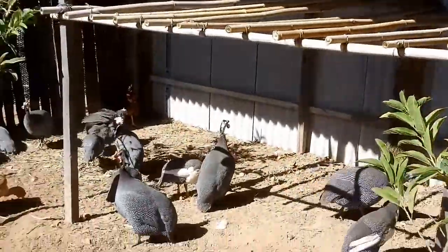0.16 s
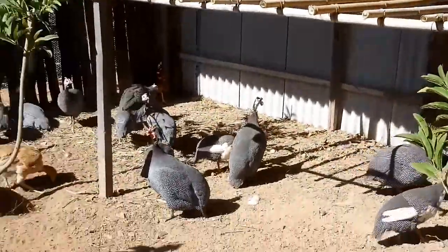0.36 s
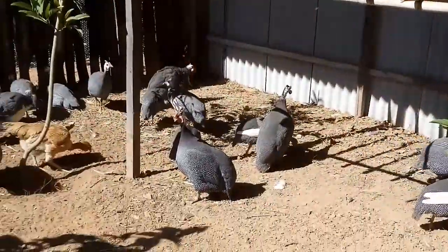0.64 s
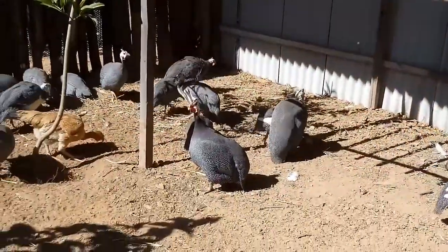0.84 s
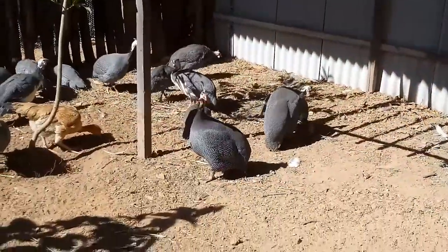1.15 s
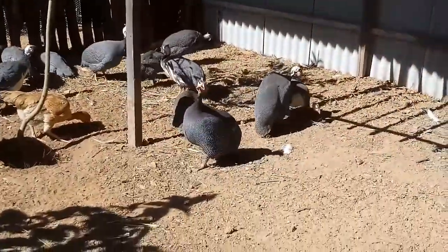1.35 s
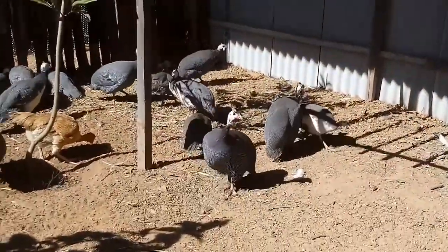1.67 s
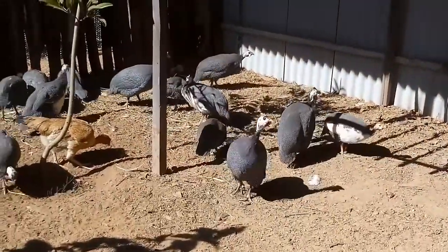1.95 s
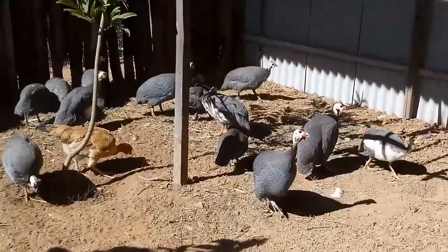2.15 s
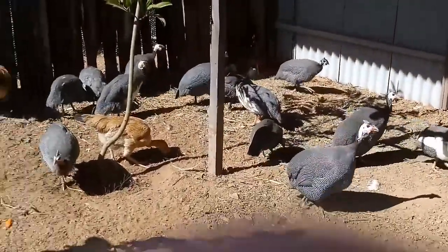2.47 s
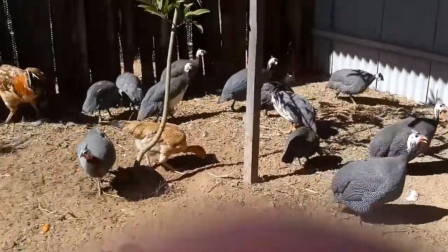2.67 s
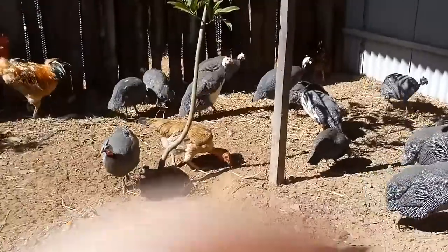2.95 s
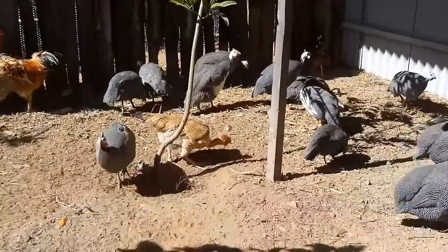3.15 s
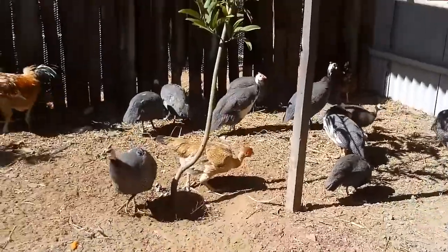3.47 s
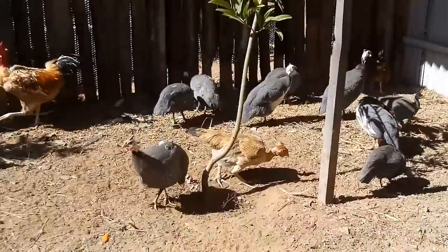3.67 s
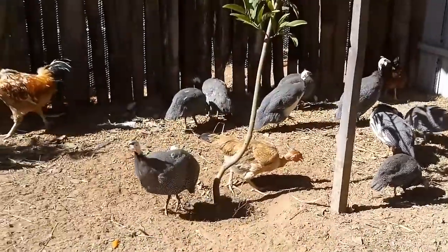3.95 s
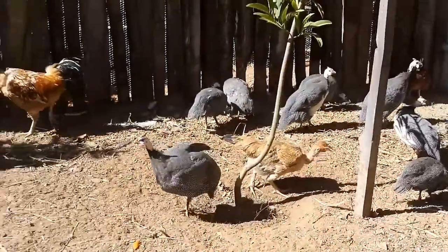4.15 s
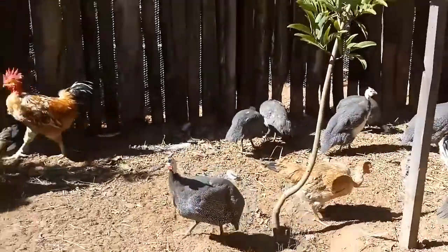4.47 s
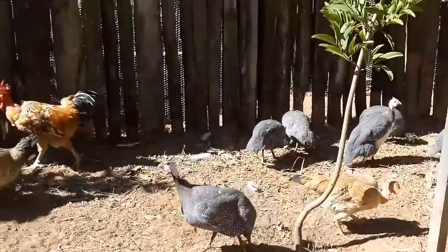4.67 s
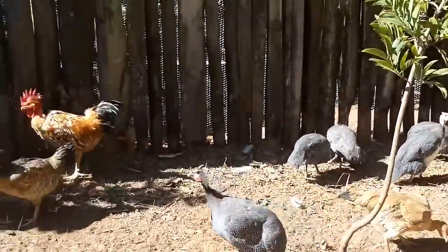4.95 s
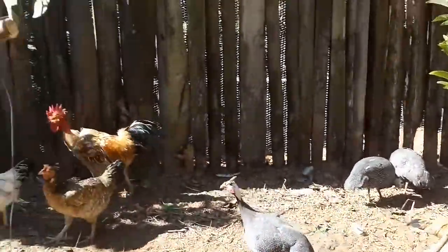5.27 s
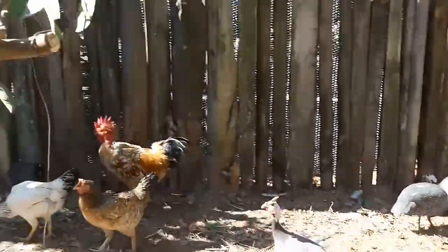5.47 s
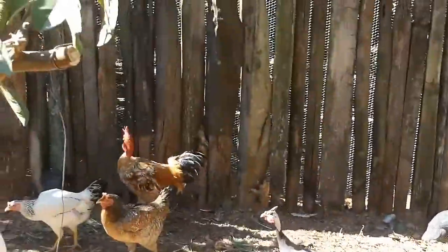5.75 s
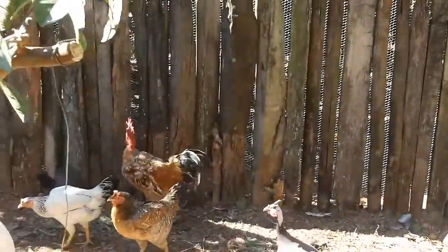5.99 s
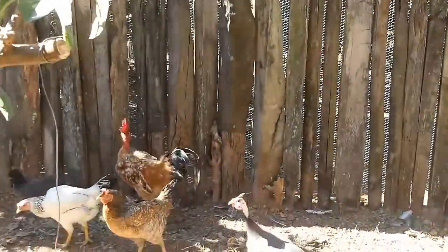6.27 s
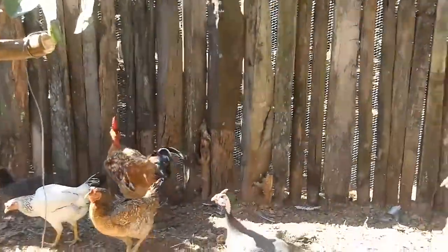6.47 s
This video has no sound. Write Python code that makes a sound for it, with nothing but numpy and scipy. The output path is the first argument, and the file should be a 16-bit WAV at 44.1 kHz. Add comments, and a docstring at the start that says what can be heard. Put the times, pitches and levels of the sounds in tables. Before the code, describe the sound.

A guineafowl flock chatters nonstop, short rising whistles overlapping harsh rattling squawks, with low hen clucks beneath and a light breeze rumbling on the microphone.

```python
"""A flock of guineafowl in a dirt pen: from the outset whistles near 1.5 kHz, as bending sines, overlap
hoarse squawks, rough partials and breath ringing a throat; wavering low harmonic stacks make hen clucks
and underlie some squawks. Sparse echoes follow each call; a breeze of filtered noise rumbles, strongest
at first, over a faint yard. Two-partial coos come near 2.9, 4.7 and 4.9 s. Just after 5.1 s the hand holding
the microphone shifts twice, as low resonant noise; the breeze sinks by 5.6 s, then rises again to the end."""
import sys
import numpy as np
from scipy import signal
from scipy.fft import rfft, irfft
from scipy.io import wavfile

SR = 44100
rng = np.random.default_rng(int(sys.argv[2]) if len(sys.argv) > 2 else 0)


def to_wav(sig):
    """Store sig (one row per channel, or 1-D mono) as 16-bit WAV at the path in sys.argv[1].

    Samples outside -1..1 are clipped; the rate is SR.
    """
    pcm = np.clip(np.atleast_2d(sig), -1, 1) * 32767
    pcm = np.round(pcm).astype(np.int16)
    wavfile.write(sys.argv[1], SR, pcm.T)  # frames by channels


def natural_amplitude(level_db):
    """Convert a level in decibels to a linear amplitude factor, elementwise."""
    exponent = np.asarray(level_db, float) / 20
    return 10 ** exponent


N = 291942  # length [samples]


def evened(x):
    """Power normalisation: scales to rms 1."""
    return x / np.sqrt(np.mean(x ** 2) + 1e-20)


def add(mix, s, sound):
    """Superposition: sums a sound into the mix from second s."""
    part = mix[round(s * SR):][:len(sound)]
    part += sound[:len(part)]


def coloured(x, points):
    """Linear filtering: multiplies the spectrum by a curve of dB over log frequency."""
    f, db = np.transpose(points)
    hz = np.fft.rfftfreq(x.shape[-1], 1 / SR)
    gain_db = np.interp(np.log(hz + 1), np.log(f + 1), db)
    return irfft(rfft(x) * natural_amplitude(gain_db), x.shape[-1])


def low_noise(size, hz):
    """Low-pass filtering: white noise with its fast changes above hz removed."""
    return signal.lfilter(*signal.butter(2, hz, fs=SR), rng.standard_normal(size))


def wobble(size, hz):
    """Random modulation: a drift of rms near 1 that changes up to hz times a second."""
    return evened(low_noise(16384, hz))[-size:].clip(-1.9, 1.9)


def resonate(x, hz, width):
    """Resonance: a moving peak of gain 1, its one-pole response applied twice for steep skirts."""
    turn = np.exp(2j * np.pi * np.cumsum(hz) / SR)
    r = np.exp(-np.pi * width / SR)
    # shift the peak to 0 Hz, filter there, shift back
    return 2 * (turn * signal.lfilter([(1 - r) ** 2], [1, -2 * r, r * r], x / turn)).real


def edges(size, rise, fall):
    """Amplitude envelope: straight fades in and out, in seconds."""
    t = np.arange(size) / SR
    return np.clip(np.minimum(t / rise, t[::-1] / fall), 0, 1)


UPPER_FADE_DB = -6.5  # the upper partials are brightest at the start of a tone
NASAL_HZ, NASAL_DB = 1460, -14.5  # tones that start below this pitch have a strong second partial
# Bending whistles of the flock, and two short high tones near 2.35 kHz within squawks:
# (time [s], length [s], start pitch [Hz], end pitch [Hz], level [dB], upper partials [dB])
BENDING_TONES = [(0.035, 0.04, 1292, 1342, -30.5, -45), (0.062, 0.086, 1512, 1594, -21.5, -29),
                 (0.14, 0.072, 1553, 1684, -34, -35), (0.213, 0.047, 981, 1156, -33.5, -44),
                 (0.297, 0.093, 1514, 1587, -34.5, -24), (0.385, 0.086, 1580, 1897, -25.5, -35.5),
                 (0.52, 0.032, 1278, 1243, -31.5, -38), (0.7, 0.12, 1500, 1564, -25.5, -27.5),
                 (0.885, 0.095, 1621, 1778, -24, -32.5), (0.965, 0.034, 1857, 1980, -26, -43),
                 (0.98, 0.13, 1500, 1500, -31.5, -25), (1.258, 0.042, 831, 1318, -40, -35.5),
                 (1.293, 0.07, 1305, 1368, -28, -35.5), (1.303, 0.1, 1526, 1554, -25, -30),
                 (1.41, 0.12, 1625, 1678, -30, -30.5), (1.645, 0.16, 1500, 1650, -29.5, -26),
                 (1.79, 0.065, 1250, 1174, -33, -61), (1.925, 0.082, 1596, 1701, -28, -34.5),
                 (1.995, 0.11, 1526, 1650, -21, -31.5), (2.19, 0.05, 1516, 1500, -36, -28),
                 (2.295, 0.039, 934, 1250, -42, -44), (2.34, 0.042, 1531, 1527, -24, -26.5),
                 (2.43, 0.13, 1490, 1732, -28.5, -28.5), (2.62, 0.049, 1225, 1310, -28.5, -42.5),
                 (2.645, 0.13, 1498, 1668, -20, -32), (2.85, 0.059, 1572, 1545, -35, -29),
                 (2.985, 0.16, 1657, 1608, -31.5, -27), (3.09, 0.1, 1540, 1527, -34, -32.5),
                 (3.265, 0.16, 1481, 1729, -26.5, -33.5), (3.48, 0.088, 1610, 1657, -25.5, -30),
                 (3.695, 0.18, 1490, 1698, -29.5, -27), (3.9, 0.1, 1500, 1663, -19.5, -33.5),
                 (4.0, 0.079, 1323, 1526, -25, -54), (4.07, 0.091, 1462, 1709, -23, -34),
                 (4.355, 0.053, 890, 1356, -38, -62), (4.425, 0.18, 1484, 1608, -28.5, -27.5),
                 (4.72, 0.044, 1350, 1336, -30, -37.5), (4.732, 0.04, 2370, 2420, -34, -37.5),
                 (5.49, 0.051, 2364, 2286, -33, -50), (4.96, 0.16, 1400, 1697, -25.5, -29.5),
                 (5.135, 0.11, 1587, 1614, -27, -24.5), (5.39, 0.051, 1240, 1252, -33, -53),
                 (5.49, 0.067, 1238, 1442, -33, -40), (5.54, 0.092, 1576, 1724, -24, -34.5),
                 (5.69, 0.068, 1220, 1397, -28, -40), (5.735, 0.11, 1440, 1530, -22.5, -29),
                 (5.8, 0.16, 1500, 1595, -30.5, -27), (6.04, 0.076, 1603, 1722, -25, -32),
                 (6.34, 0.13, 1254, 1268, -41, -42.5), (6.515, 0.042, 1513, 1500, -25.5, -27),
                 (6.565, 0.069, 1563, 1742, -27, -30)]


def bending_tone(length, start_hz, end_hz, db, third_db):
    """Frequency modulation: a near sine bends and roughens; pressed voices have strong, smeared upper partials."""
    size = round(length * SR)
    u = np.linspace(0, 1, size)
    pressed = np.clip(.5 + (third_db - db + 8) / 14, .15, 1)
    hoarse = pressed * (.3 + u)
    glide_hz = start_hz + (end_hz - start_hz) * u ** 1.1
    hz = glide_hz * (1 + 0.0211 * hoarse * wobble(size, hz=122))
    a = 2 * np.pi * np.cumsum(hz) / SR
    tremble = natural_amplitude(6.83 * hoarse * wobble(size, hz=108.3))
    flutter = np.cos(a / 4.9 + 2.0 * wobble(size, hz=45.4))  # a slower membrane cycle adds sidebands
    smear = hoarse * (.5 * wobble(size, hz=200) + 1.2 * flutter)
    upper = np.sin(3 * a + smear) + natural_amplitude(7.5) * np.sin(4 * a + smear)
    upper = resonate(upper, np.full(size, 4750.), width=795)  # the beak favours one band
    upper *= natural_amplitude(third_db + UPPER_FADE_DB * (u - .5) + 4.2 * hoarse * wobble(size, hz=145))
    second_db = NASAL_DB if start_hz < NASAL_HZ else -21  # relative to the first partial
    second = natural_amplitude(second_db) * np.sin(2 * a + .5 * smear)
    tone = natural_amplitude(db) * tremble * (1 + .5 * u * flutter) * (np.sin(a) + second)
    return np.sqrt(2) * (tone + upper) * edges(size, 0.011, 0.019)


PULSE_HZ = 352  # nominal pitch, before drift
PUFF_DB, PUFF_HZ = -60, 160  # the low push of air under a squawk: level, low-pass corner
CHEST_DB = -49  # the lowest partial, before effort and wobble
# tilt of the beak bands at 0 dB effort [dB], and how much they regain per dB of lost effort
TREBLE_DB, TREBLE_PER_DB = -18.5, 1.0239
# Throat resonances of a squawk: (centre [Hz], width per pole [Hz], level [dB], share of the beak tilt [0-1])
THROAT_RINGS = [(670, 620, -11, 0.21), (1500, 510, -4.5, 0.83), (1920, 630, 0.5, 0.67),
                (2474, 1210, -7.5, 0.37), (3970, 1800, -11.5, 0.041), (4750, 800, -1, 0.58),
                (5450, 1810, -7, 0.8)]
# Hoarse squawks of the flock: (time [s], rise [s], length [s], effort [dB])
SQUAWK_NOTES = [(0.022, 0.024, 0.099, -3.5), (0.11, 0.035, 0.24, -20), (0.33, 0.029, 0.23, -9.5),
                (0.577, 0.019, 0.16, -6), (0.78, 0.051, 0.14, -12), (0.93, 0.03, 0.33, -20),
                (1.1, 0.038, 0.19, -11), (1.36, 0.057, 0.25, -11), (1.65, 0.032, 0.24, -16.5),
                (1.945, 0.03, 0.19, -13), (2.113, 0.024, 0.13, -5), (2.296, 0.047, 0.15, -40),
                (2.34, 0.037, 0.3, -13.5), (2.68, 0.0077, 0.17, -15), (2.84, 0.035, 0.048, -14.5),
                (2.995, 0.043, 0.24, -10), (3.275, 0.022, 0.21, -8.5), (3.52, 0.039, 0.13, -15.5),
                (3.677, 0.022, 0.13, -3), (3.76, 0.068, 0.2, -19), (3.96, 0.089, 0.26, -19.5),
                (4.25, 0.0069, 0.16, -9), (4.44, 0.033, 0.23, -10.5), (4.73, 0.018, 0.046, -24),
                (4.79, 0.0073, 0.12, -2.5), (4.99, 0.15, 0.28, -25), (5.2, 0.1, 0.24, -8),
                (5.495, 0.033, 0.067, -21), (5.58, 0.038, 0.24, -19), (5.76, 0.11, 0.31, -21.5),
                (6.06, 0.075, 0.16, -23), (6.252, 0.012, 0.15, -6), (6.52, 0.037, 0.21, -24.5)]


def squawk(rise, length, effort_db):
    """Source and filter: rattling partials and breath ring a throat that drops if hard, climbs if soft."""
    size = round(length * SR)
    t = np.arange(size) / SR
    hard = np.clip((.035 - rise) / .015, 0, 1)  # a quick rise is a hard start
    slow_drift = rng.uniform(-0.047, 0.16) + .04 * wobble(size, hz=12)
    drift = 1 + (1.3 - hard) * slow_drift + 0.01595 * wobble(size, hz=159)
    turns = np.cumsum(PULSE_HZ * drift) / SR
    folds = np.zeros(size)
    for k in range(3, 20):
        folds += natural_amplitude(6.1 * wobble(size, hz=31.0)) * np.cos(2 * np.pi * (k * turns + rng.random()))
    breath = rng.standard_normal(size)
    drive = .8 * evened(folds) + .45 * breath
    drive *= natural_amplitude(2.5 * wobble(size, hz=130).clip(-3, 1.5))  # the rattle
    onset = hard * np.exp(-t / .025)
    mouth = 1 + 0.2 * onset + (1 - hard) * 0.058 * (t / length - .4)
    out = np.zeros(size)
    for k, (hz, width, db, treble) in enumerate(THROAT_RINGS):
        lean_db = treble * (TREBLE_DB - TREBLE_PER_DB * effort_db) + 2.5 * wobble(size, hz=12)
        lean_db -= 17 * onset * abs(np.log2(hz / 3000))  # a hard start first favours the bands near 3 kHz
        out += (-1) ** k * natural_amplitude(db + lean_db) * resonate(drive, hz * mouth, width)
    out += natural_amplitude(PUFF_DB) * evened(low_noise(size, PUFF_HZ))
    out += natural_amplitude(CHEST_DB + 6.7 * wobble(size, hz=30)) * np.sin(2 * np.pi * turns)
    fade_db = -18 * np.clip((t - rise) / (length - rise), 0, 1) ** 0.81
    return natural_amplitude(effort_db + fade_db) * out * edges(size, rise, 0.077) ** (1 - .5 * hard)


# one throat resonance: its centre, the detuning that costs 6 dB, the most lost, the weak first partial
LOW_THROAT_HZ, LOW_DETUNE_HZ, LOW_LOSS_DB, LOW_FIRST_DB = 988, 42.7, 20.5, -15.5
# Low harmonic notes near 330 Hz: hen clucks, and the low partials under some squawks:
# (time [s], length [s], nominal pitch [Hz], level [dB])
LOW_NOTES = [(0.04, 0.25, 347.5, -49), (0.22, 0.039, 352, -36), (0.43, 0.071, 332.4, -44),
             (0.59, 0.15, 355, -51), (0.78, 0.1, 331.3, -46.5), (0.96, 0.098, 327, -47.5),
             (1.08, 0.12, 319, -50.5), (1.4, 0.042, 345, -41), (1.49, 0.058, 327.8, -45),
             (2.05, 0.073, 336, -44), (2.46, 0.1, 333.3, -46.5), (2.83, 0.063, 309.1, -35),
             (3.04, 0.06, 335.6, -45.5), (3.14, 0.062, 314, -45.5), (3.3, 0.16, 327.6, -47.5),
             (3.54, 0.07, 332, -45), (3.69, 0.093, 352, -44), (3.84, 0.061, 326, -45),
             (3.98, 0.13, 335.5, -47), (4.25, 0.071, 336.3, -41.5), (4.5, 0.13, 330, -48.5),
             (5.08, 0.087, 331, -45.5), (5.2, 0.25, 352, -45.5), (5.6, 0.1, 328.5, -51.5),
             (5.82, 0.16, 329.6, -44.5), (6.08, 0.11, 328.6, -51.5), (6.26, 0.087, 352, -42.5),
             (6.34, 0.059, 301.7, -34.5), (6.55, 0.072, 335.4, -50)]


def low_note(length, hz, db):
    """Harmonic series: a wavering stack that favours partials near 1, 2 and 3.7 kHz."""
    size = round(length * SR)
    scoop = .1 * np.exp(-np.arange(size) / SR / .015)  # the pitch rises at the start
    pitch_hz = hz * (1 + .018 * wobble(size, hz=45) - scoop)
    a = 2 * np.pi * np.cumsum(pitch_hz) / SR
    stack = np.sin(3 * a) + natural_amplitude(7.0) * np.sin(6 * a) + natural_amplitude(-8) * np.sin(11 * a)
    stack += natural_amplitude(-16) * (np.sin(2 * a) + np.sin(4 * a))
    detuning = (3 * hz - LOW_THROAT_HZ) / LOW_DETUNE_HZ
    third_db = db - min(6 * detuning ** 2, LOW_LOSS_DB)
    first = natural_amplitude(db + LOW_FIRST_DB + 4.5 * wobble(size, hz=35)) * np.sin(a)
    stack *= natural_amplitude(third_db + 5.8 * wobble(size, hz=51.6))
    return np.sqrt(2) * (first + stack) * edges(size, 0.0067, 0.0059)


# Soft coos of the hens: (time [s], length [s], pitch [Hz], first partial [dB], second partial [dB])
COO_NOTES = [(2.91, 0.091, 562, -61, -43.5), (4.65, 0.085, 783, -53, -67), (4.91, 0.095, 720, -54, -54)]


def coo(length, hz, db, second_db):
    """Additive synthesis: a short steady note of two harmonic partials."""
    size = round(length * SR)
    a = 2 * np.pi * hz * np.arange(size) / SR
    return (natural_amplitude(db) * np.sin(a) + natural_amplitude(second_db) * np.sin(2 * a)) * edges(size, 0.014, 0.022)


def pen(x, t60=.16):
    """Reverberation by convolution: sparse echoes of random sign off sheet metal and posts, dying fast."""
    size = SR // 2
    taps = np.zeros(size)
    at = np.arange(200, size - 20, 20)
    taps[at + rng.integers(0, 20, len(at))] = rng.choice([-1., 1.], len(at))
    taps *= natural_amplitude(-60 * np.arange(size) / SR / t60)
    return signal.fftconvolve(x, taps / np.linalg.norm(taps))[:N]


THUMP_HZ, THUMP_WIDTH_HZ = 96, 82
# Shifts of the hand on the microphone case: (time [s], length [s], level before the fades [dB])
HAND_SHIFTS = [(5.141, 0.097, -51), (5.27, 0.078, -59)]


def thump(length, db):
    """Structure-borne sound: resonant noise gives a dull low rumble through the case."""
    size = round(length * SR)
    rumble = resonate(rng.standard_normal(size), np.full(size, THUMP_HZ), THUMP_WIDTH_HZ)
    return natural_amplitude(db) * evened(rumble) * edges(size, 0.019, 0.049)


# Breeze strength, before its random lumps: (time [s], level [dB])
BREEZE_LEVEL = [(0, -46.5), (2.7, -56.5), (5.2, -54), (5.6, -61), (6.62, -53.5)]


def breeze():
    """Turbulence noise: lumpy low-frequency rumble of wind on the microphone port."""
    s, db = np.transpose(BREEZE_LEVEL)
    lumps = evened(low_noise(N, hz=9))
    level = natural_amplitude(np.interp(np.arange(N) / SR, s, db) + 5.5 * lumps.clip(-3, 1.8))
    rumble_curve = [(35, -30), (60, 3.0), (95, -27), (220, 0), (500, -2.5)]  # (Hz, dB)
    return level * evened(coloured(rng.standard_normal(N), rumble_curve))


YARD_DB = -57
# Spectrum of the far yard: (frequency [Hz], relative density [dB per Hz])
YARD_SPECTRUM = [(100, -12), (670, -5), (1590, 8), (2320, -10), (4560, -14), (7500, -35)]


def far_yard():
    """Stationary ambient noise: white noise shaped to a fixed spectrum at a steady level."""
    return natural_amplitude(YARD_DB) * evened(coloured(rng.standard_normal(N), YARD_SPECTRUM))


def scene():
    """Superposition of the flock, its echoes, the far yard, the breeze and the hand."""
    flock = np.zeros(N)
    voices = (BENDING_TONES, bending_tone), (SQUAWK_NOTES, squawk), (LOW_NOTES, low_note), (COO_NOTES, coo)
    for table, voice in voices:
        for s, *note in table:
            add(flock, s, voice(*note))
    hand = np.zeros(N)
    for s, *shift in HAND_SHIFTS:
        add(hand, s, thump(*shift))
    echoes = natural_amplitude(-2.0) * pen(flock)
    return (flock + echoes + far_yard() + breeze() + hand)[None]


# Frequency response of the microphone: (frequency [Hz], gain [dB])
MICROPHONE_COLOUR = [(100, 12.5), (6300, 2), (7300, 5.5), (7750, 2.5), (7850, -36)]


def microphone(x):
    """Frequency response: the microphone weights each frequency by a fixed gain."""
    return coloured(x, MICROPHONE_COLOUR)


# Copies of the band from about 4 kHz, higher up: (upward shift [Hz], level [dB])
SHIFTED_COPIES = [(3890, -24), (7780, -27.5)]


def shifted_treble(x):
    """Single-sideband modulation: the treble band repeats faintly at higher frequencies."""
    band = signal.hilbert(coloured(x, [(3700, -50), (3850, 3.0), (5000, 3.5), (7700, 19.0)]))
    t = np.arange(N) / SR
    return sum(natural_amplitude(db) * (band * np.exp(2j * np.pi * hz * t)).real for hz, db in SHIFTED_COPIES)


def top_cut(x):
    """Nothing passes above the cut-off."""
    return signal.sosfilt(signal.butter(12, 16480, fs=SR, output="sos"), x)


def record(dry):
    """Processing chain: a frequency response, fainter copies of the treble shifted upward, soft saturation."""
    x = microphone(dry)
    x = x + shifted_treble(x)
    x = .75 * np.tanh(x / .75)  # soft overload
    return top_cut(x)


dry = scene()
out = record(dry)
to_wav(out)
```